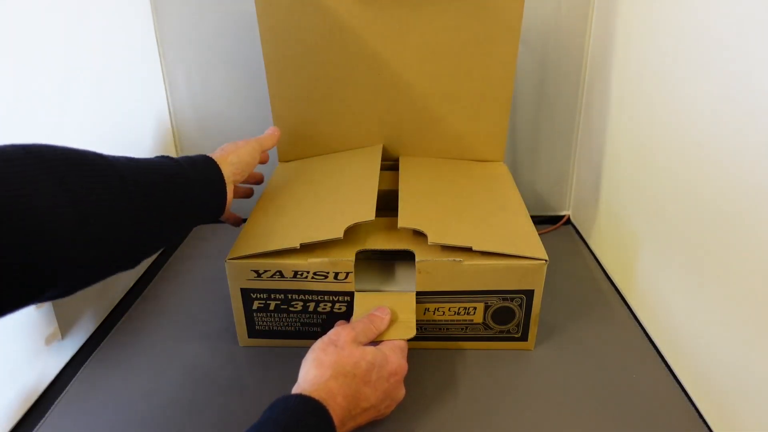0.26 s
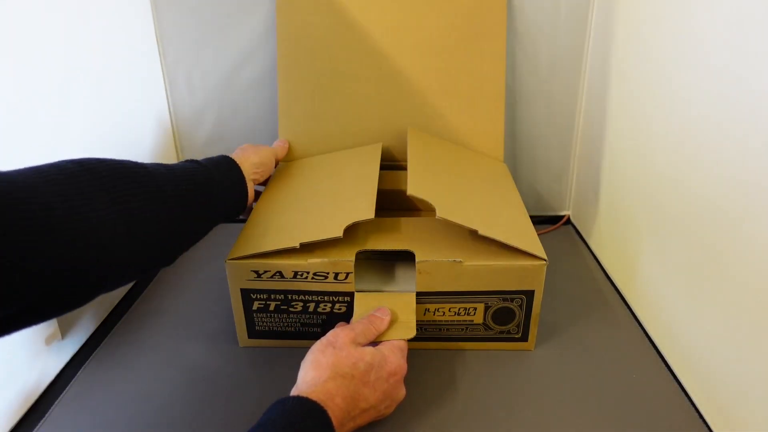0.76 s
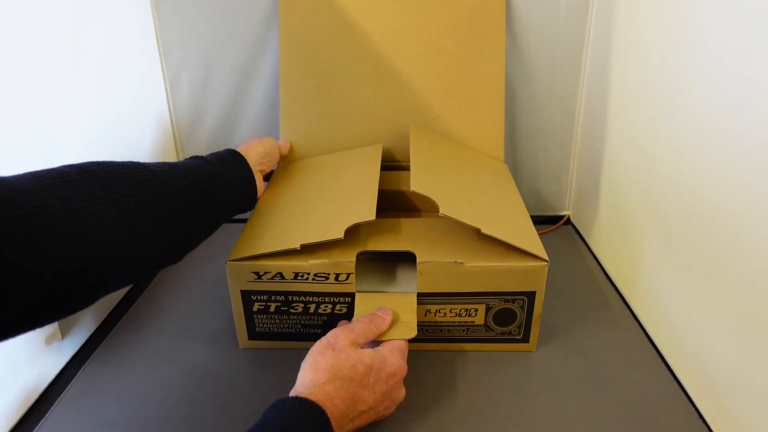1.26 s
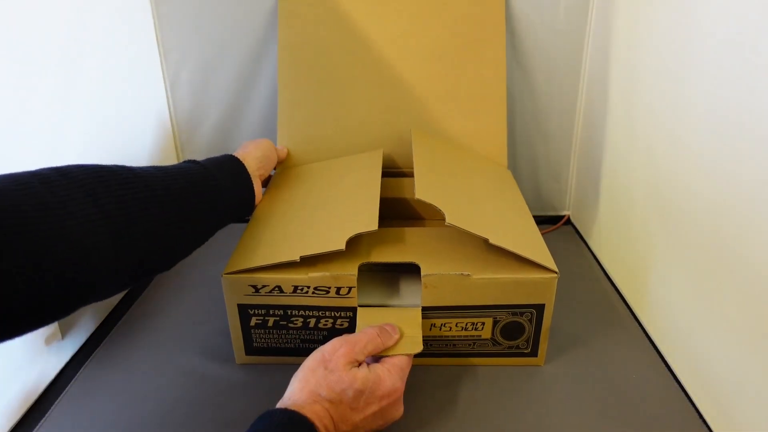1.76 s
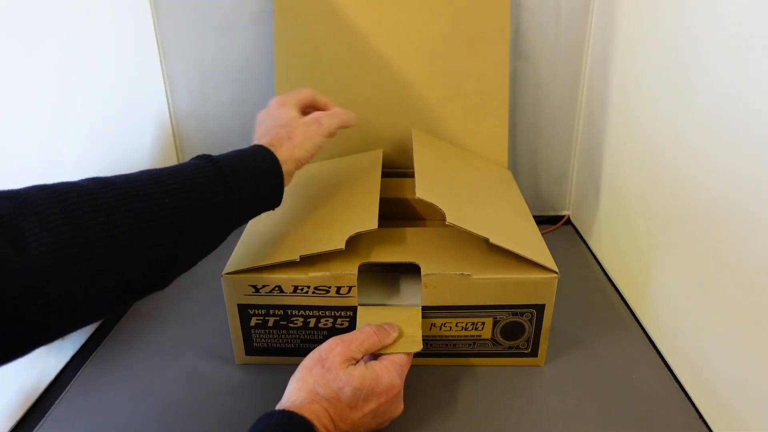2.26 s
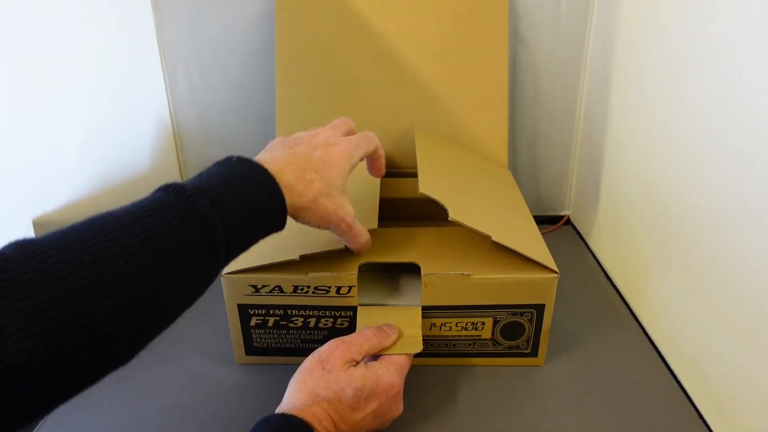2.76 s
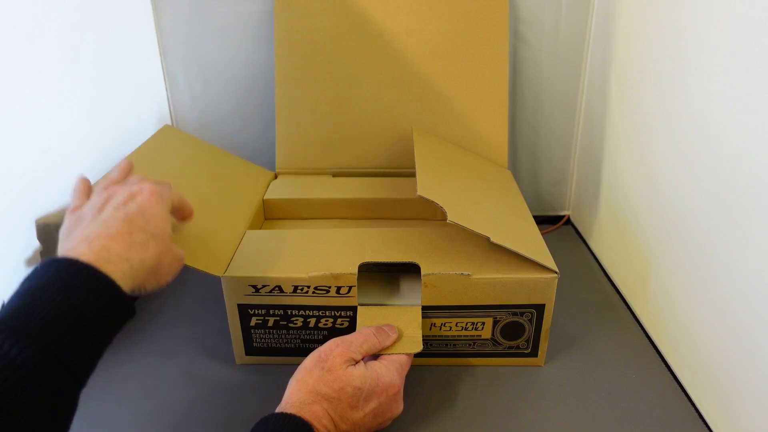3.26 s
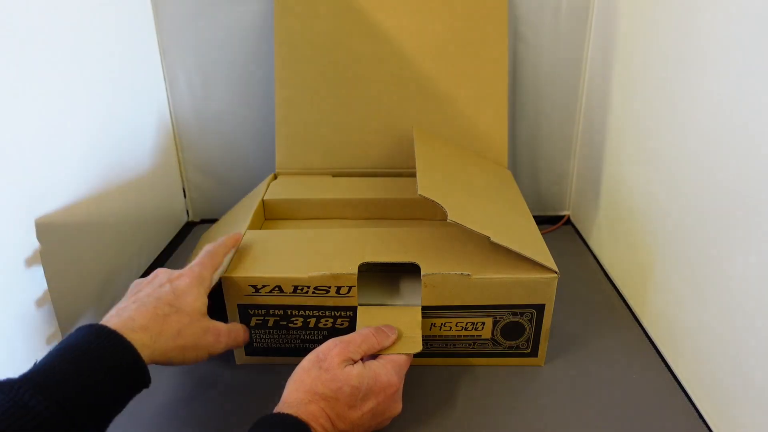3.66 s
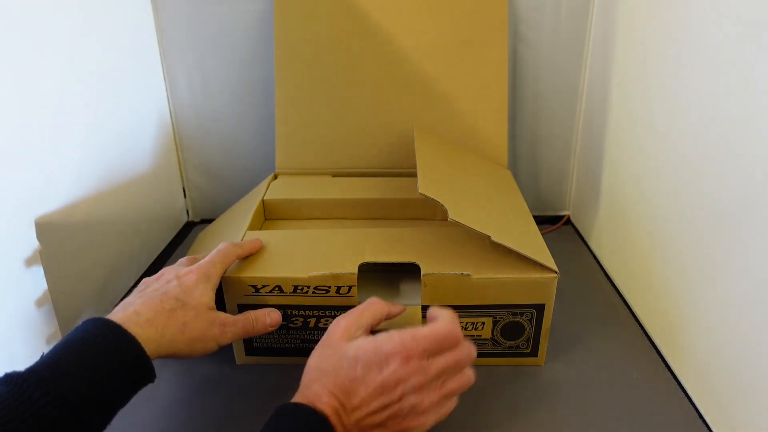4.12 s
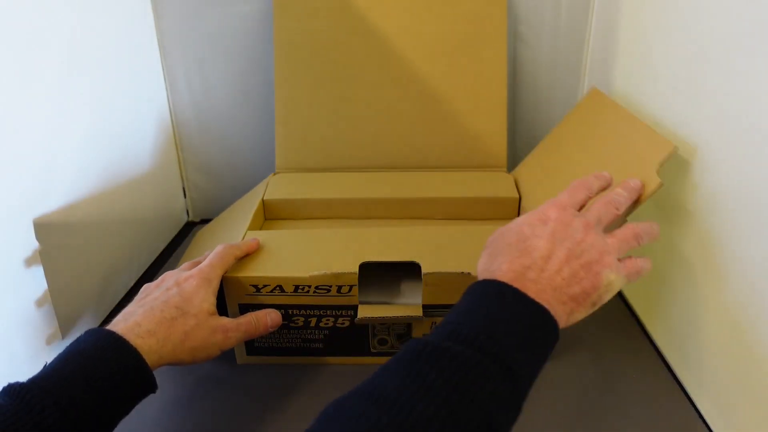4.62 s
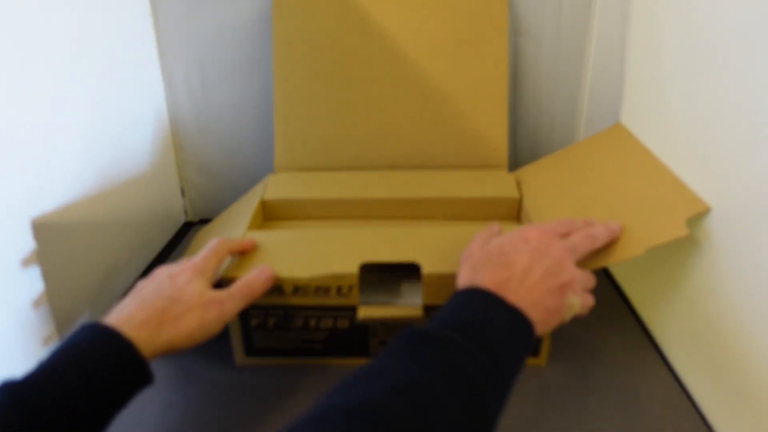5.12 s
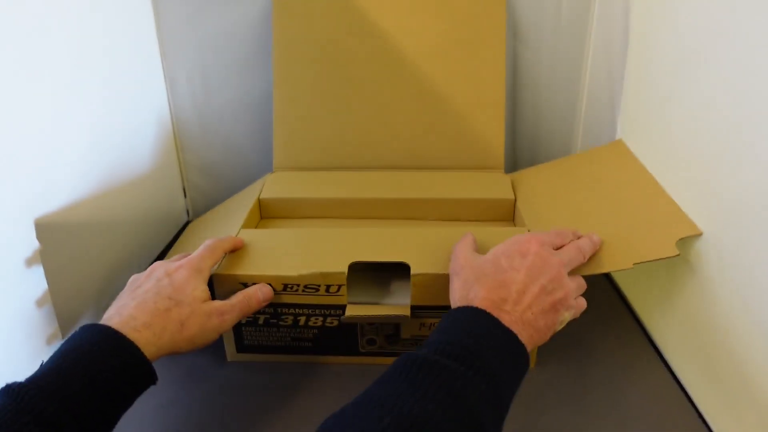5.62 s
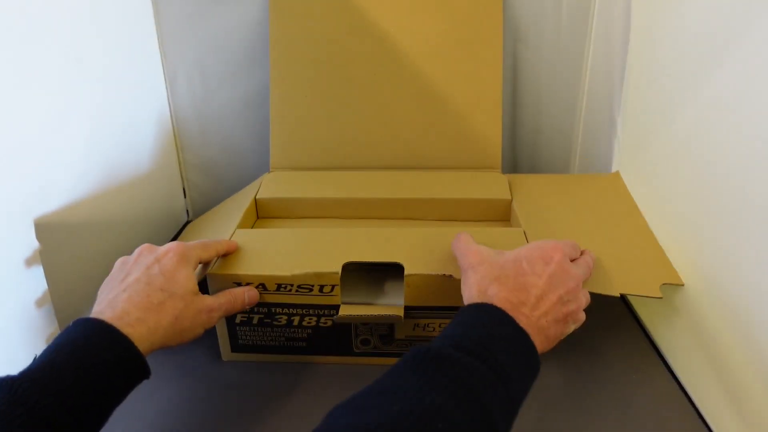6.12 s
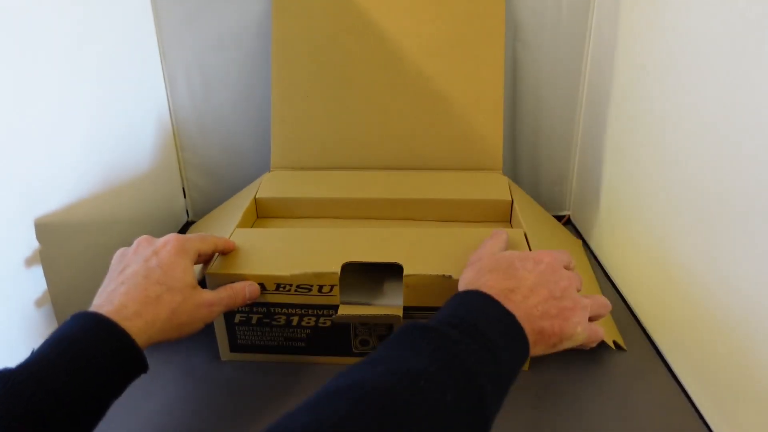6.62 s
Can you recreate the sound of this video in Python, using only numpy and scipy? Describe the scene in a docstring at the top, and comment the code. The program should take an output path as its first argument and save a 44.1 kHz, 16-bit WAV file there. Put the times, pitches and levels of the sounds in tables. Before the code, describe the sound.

Steady low air noise, short room echo. Fingers slide and tap lightly on an empty-sounding carton, with dry fibre clicks and boxy thuds, mostly soft and sparse. Toward the end come a brief hissing scrape, then much louder rasping stick-slip bursts of a cardboard edge dragging on a wall, with sharp cracks, before dying to faint rubbing. Close stereo microphone, roughly centred.

```python
"""Cardboard box in a narrow corner of a quiet room; hands open its two flaps.
Sliding fingers and edges: random friction rings the hollow box, the board and the fibres.
Fingertip knocks drum on box modes, edges tick as ringing crackles, fibres crack as clicks.
At last the edge of the right flap judders down a wall in stick-slip strokes.
Scattered echoes of the corner, a short room tail and steady air noise surround it."""
import sys
import numpy as np
from scipy import signal
from scipy.fft import rfft, irfft, next_fast_len
from scipy.io import wavfile

SR = 44100
rng = np.random.default_rng(int(sys.argv[2]) if len(sys.argv) > 2 else 0)


def bounce(signal):
    """Save signal as a 16-bit WAV file at the path given by the first command-line argument."""
    frames = np.transpose(np.atleast_2d(signal))
    limited = np.clip(frames, -1, 1)
    pcm = np.round(limited * 32767).astype(np.int16)
    wavfile.write(sys.argv[1], SR, pcm)


def volts(x):
    """Linear amplitude factor 10**(x/20) for a level x in dB, scalar or array-like."""
    e = np.asarray(x, float) / 20
    return 10 ** e


N = 303408

# edges catching: start_s, level_db, ring_hz
TICKS = [(0.3563, -31, 990), (0.853, -24, 1650), (3.0064, -19, 1080), (3.3555, -21, 2550),
         (3.503, -23.5, 1470), (3.7269, -26.5, 1200), (3.8818, -17.5, 2300), (3.945, -23, 2400),
         (4.153, -16.5, 1200), (4.2145, -19.5, 1450), (4.2927, -27, 1220), (4.4493, -25.5, 4080),
         (4.619, -38, 5070), (5.2362, -20.5, 1190), (5.396, -22, 1140), (6.031, -2, 910),
         (6.468, -21.5, 2880), (6.7415, -32.5, 2310)]
# soft fingertip knocks on the box: start_s, level_db, favoured_hz, shoved_air_db
KNOCKS = [(0.011, -31, 259, -5), (0.297, -24.5, 292, -18), (0.355, -15, 275, -8), (0.791, -24, 250, -1),
          (2.4165, -11.5, 427, 16), (2.427, -16, 297, -6), (2.441, -21, 277, 0), (2.494, -17, 455, 20),
          (2.543, -19, 199, 13), (3.343, -16.5, 350, 15), (3.895, -21, 250, -7), (4.211, -39, 196, 9.5),
          (4.372, -20.5, 295, 7), (4.421, -22, 350, 14), (4.469, -23, 600, 1), (4.637, -22, 455, 7)]
# single fibres cracking, dry and bright: start_s, level_db
SNAPS = [(.7883, -28), (2.4155, -27), (2.433, -28), (2.4885, -26), (3.3432, -17), (3.356, -20),
         (3.8805, -22), (4.198, -33), (5.9195, -11), (6.249, -8)]

# resonances of the hollow box: centre_hz, width_hz, level_db
BOX_MODES = [(126, 53, -11.5), (216, 53, 0.5), (275, 47, 2.5), (395.4, 62, 1), (448, 55, 2),
             (670, 250, -2.5)]
# resonances of the lid panels: centre_hz, width_hz, level_db
LID_MODES = [(670, 10, 6.5), (820, 91, 6.5), (1200, 450, -2), (1577, 215, 2), (2004, 380, -3),
             (2810, 950, -4), (4060, 1240, -11.5)]
# resonances of a panel held by one edge only: centre_hz, width_hz, level_db
FREE_PANEL_MODES = [(760, 200, 2), (1200, 280, 4.5), (1580, 280, 5.5), (2600, 420, 1.5), (3750, 760, -3)]
# resonances of the flap pressed on the wall: centre_hz, width_hz, level_db
WALL_FLAP_MODES = [(752, 142, -1), (823, 75, 5), (968, 73, -2.5), (1115, 76, -2), (1290, 117, -4.5),
                   (1474, 98, 1), (1660, 172, -1), (2310, 410, -9), (2997, 220, -7), (3326, 170, -13),
                   (4010, 254, -8)]
# broad resonances of the fibres: centre_hz, width_hz, level_db
FIBRE_MODES = [(4640, 2200, -1), (6420, 2400, 6.5), (7910, 3900, 6), (10220, 4400, 3), (13700, 3800, -2)]

# strokes of fingers and edges, swelling and fading:
# start_s, length_s, level_db, drum_db (re level), hiss_db (re level)
SLIDES = [(-.02, 0.18, -47.5, -15, -5), (.14, 0.27, -55, -21, 0), (.845, 0.087, -49, -2, -11),
          (1.2, 0.21, -48, -3.5, -6.5), (1.46, 0.37, -35, -7, -5.5), (2.89, .1, -41.5, -8.5, -2),
          (3.1, 0.44, -46, -17, -1.1), (3.375, 0.076, -44, -14, 2.5), (3.97, 0.15, -40, -14.5, -2),
          (4.09, 0.1, -43, -10, -3), (4.52, 0.087, -44.5, -6, -1), (4.85, 0.097, -21, -26, -1),
          (5.025, 0.057, -27.5, -11.5, -3), (5.13, 0.059, -25, -10, -2), (5.94, 0.066, -13.5, -16, -7),
          (6.39, 0.094, -39, -7.5, -2.5), (6.51, 0.16, -47.5, -14, -4.5), (6.75, 0.42, -47, -12, -2)]
SLIDE_RISE_DB_PER_S, SLIDE_FALL_DB_PER_S, SWELL_DB = 402, 240, 7.5
# a hand lands or a stuck edge breaks loose, holds, lets go:
# start_s, length_s, level_db, drum_db (re level), hiss_db (re level)
SLIPS = [(.553, .06, -38, 0, -5), (.788, 0.016, -36, -9, -2), (1.536, .03, -39, -6, -6),
         (1.604, .02, -35, -7, -6), (1.948, 0.13, -41.5, -7, -5.5), (2.405, 0.03, -37, -4, -3.5),
         (2.476, 0.048, -36.5, -3, -6), (2.54, 0.01, -41.5, -6, -4), (2.791, 0.027, -41.5, -5.5, -2),
         (3.004, 0.034, -39.5, -8.5, -2.5), (3.331, 0.05, -40, -1, -4.5), (3.725, .08, -47.5, -9, -2),
         (3.88, 0.013, -39, -12, -4), (4.21, 0.019, -39.5, -0.5, -6), (4.364, 0.018, -38.5, -2, -2),
         (4.412, 0.013, -37, -3, -3), (4.45, 0.014, -35.5, -3.5, -3.5), (4.615, 0.014, -37.5, -4, -0.6),
         (4.782, 0.06, -38.5, -20, -2.5), (5.256, 0.067, -27, -11.5, -2.5), (5.395, 0.013, -38.5, -8, -3),
         (6.229, 0.075, -11.5, -21, -8.5)]
SLIP_RISE_DB_PER_S, SLIP_FALL_DB_PER_S, SAG_DB = 2600, 358, 1.5
# firm strokes, level or climbing, that end abruptly:
# start_s, length_s, end_level_db, drum_db (re level), hiss_db (re level), climb_db
FIRM_STROKES = [(.612, .051, -18.5, -12.5, -2, 9), (5.43, 0.14, -31.5, -13.5, -10.5, 4.7),
                (5.58, .187, -15, -22, -4.5, 10), (5.834, 0.076, -16.5, -15, -7.5, 0.9),
                (6.072, .122, -13, -18, -9.5, 0.5)]
FIRM_RISE_DB_PER_S, FIRM_FALL_DB_PER_S, DRUM_CLIMB_SHARE = 459, 708, 0.4
SETTLE_DB, SETTLE_DB_PER_S = -17.5, 136   # faint settling after each stroke
HISS_DIES_DB = 1.5   # extra loss of hiss once a stroke has fallen by SETTLE_DB

# brief dips and lifts in the scrape: centre_s, depth_db (negative lifts)
SCRAPE_DIPS = [(5.246, 12), (5.913, 20), (5.926, 0), (6.026, -5), (6.043, 17), (6.219, -1)]
DIP_S = 0.005
# air between flap and wall, dropping in pitch as they meet: time_s, pitch_hz
GAP_PITCH = [(4.83, 900), (4.905, 836.5), (4.945, 563), (4.99, 500)]
FLAP_EDGE_HZ = 2950   # whistle of the free edge
# topmost treble of the hiss: time_s, level_db
SHEEN_CURVE = [(.3, -6), (2.6, -1), (3.2, 6), (4.9, 3), (5.6, -2)]
SHEEN_HZ = 12500
ON_BOX_S = (1.1, 4.72)   # hands on the box between these, else on a free panel
WALL_PRESSED_S = (5.3, 5.35)   # right flap, dragging on the wall, bends against it
BOARD_T60_MS, BOARD_DB = 40, -8   # many small modes of the board

# balance: time_s, left_minus_right_db
PAN_CURVE = [(0, 0), (4.7, 1), (5.1, -1), (6.3, -0.5), (6.5, 0.5)]
# spectrum shape of the air noise: frequency_hz, relative_db
AIR_SPECTRUM = [(24, -56), (40, -2.5), (176, 1), (283, 2), (570, -6), (1590, -8), (1950, -11.5),
                (14500, -19), (16000, -18.5)]
AIR_RMS_DB = -53.5
ROOM_T60_S, ROOM_DB, WALL_CUT_HZ = 0.39, -18.5, 4900   # T60 in the bass
ECHO_T60_MS, ECHO_DB, ECHO_CUT_HZ = 55, -11, 3500


def rms_one(x):
    """Scale to rms 1."""
    return x / np.sqrt(np.mean(x ** 2) + 1e-20)


def in_time(rows):
    """Columns of a curve, interpolated at every sample."""
    s, *columns = np.transpose(rows)
    return [np.interp(np.arange(N) / SR, s, c) for c in columns]


def drift(rate_hz):
    """Slow chance of rms 1: noise through two equal poles, at every 40th sample."""
    r = np.exp(-80 * np.pi * rate_hz / SR)
    noise = rng.standard_normal(N // 40 + 2002)
    slow = signal.lfilter([1], [1, -2 * r, r * r], noise)[2000:]
    return np.interp(np.arange(N) / 40, np.arange(len(slow)), rms_one(slow))


def cut(x, hz, kind, order=2):
    """Butterworth high- or low-pass."""
    return signal.sosfilt(signal.butter(order, hz, kind, fs=SR, output="sos"), x)


def resonance(hz, width_hz):
    """Two-pole filter with gain about 1 at its centre."""
    r = np.exp(-np.pi * width_hz / SR)
    b = (1 - r * r) / 2 * np.array([1, 0, -1])
    return b, [1, -2 * r * np.cos(2 * np.pi * hz / SR), r * r]


def resonate(x, modes, waver_db=0):
    """Parallel modes of alternating sign; the contact point wanders, so each drive wavers."""
    out = 0
    for k, (hz, width_hz, level_db) in enumerate(modes):
        driven = x * volts(waver_db * drift(7.7)) if waver_db else x
        ringing = signal.lfilter(*resonance(hz, width_hz), driven + 1e-18)
        out = out + (-1) ** k * volts(level_db) * ringing
    return out


def rubbed(force, level_db, modes, waver_db):
    """Friction force rings a body whose click response is scaled to unit energy."""
    click_response = resonate(signal.unit_impulse(SR // 4), modes)
    return resonate(force * volts(level_db), modes, waver_db) / np.linalg.norm(click_response)


def scatter(x, t60_ms):
    """Equal-power smear by three dying noise bursts; their mix drifts as hands and flaps move."""
    decay = volts(-60000 * np.arange(SR // 8) / SR / t60_ms)
    bursts = rng.standard_normal((3, SR // 8)) * decay
    weights = volts(9 * np.array([drift(2.5) for _ in bursts]))
    weights = weights / np.linalg.norm(weights, axis=0)
    out = 0
    for weight, burst in zip(weights, bursts):
        out = out + signal.oaconvolve(x * weight, burst / np.linalg.norm(burst))[:N]
    return out


def room_tone():
    """Steady shaped air noise, mostly alike in both channels."""
    hz = np.maximum(np.fft.rfftfreq(N, 1 / SR), 1)
    shape_hz, shape_db = np.transpose(AIR_SPECTRUM)
    shape = volts(np.interp(np.log(hz), np.log(shape_hz), shape_db))
    mid, side = irfft(rfft(rng.standard_normal((2, N))) * shape, N)
    return volts(AIR_RMS_DB) * rms_one(mid + volts(-5.0) * side * np.array([[1], [-1]]))


def rubbing():
    """Friction drives the hollow box, the panel under the contact, the fibres and the air gap."""
    power = (strokes(SLIDES, SLIDE_RISE_DB_PER_S, SLIDE_FALL_DB_PER_S, swell_db=SWELL_DB)
             + strokes(SLIPS, SLIP_RISE_DB_PER_S, SLIP_FALL_DB_PER_S, sag_db=SAG_DB)
             + strokes(FIRM_STROKES, FIRM_RISE_DB_PER_S, FIRM_FALL_DB_PER_S))
    drum_db, rasp_db, hiss_db = 10 * np.log10(power + 1e-12) + scrape_dips()
    fine = friction(2500, spread_db=0.0, smooth_db=-4.5, judder_db=1.5)
    coarse = friction(1100, spread_db=2.2, smooth_db=-10, judder_db=0.7)
    stroking = 0.8 * fine + 0.6 * coarse
    t = np.arange(N) / SR
    bent = np.interp(t, WALL_PRESSED_S, [0, 1])
    on_box = (t > ON_BOX_S[0]) & (t < ON_BOX_S[1])

    panels = (free_panel(stroking * ~on_box * np.sqrt(1 - bent), rasp_db)
              + lid(stroking * on_box, rasp_db)
              + flap_on_wall(stroking, bent, rasp_db))
    board = cut(panels, 576, "high") + fibre_hiss(fine, coarse, bent, hiss_db) + air_gap(fine, hiss_db)
    small_modes = volts(BOARD_DB) * scatter(board, BOARD_T60_MS)
    return box_drum(fine, drum_db) + volts(-1.5) * (board + small_modes)


def strokes(rows, rise_db_per_s, fall_db_per_s, swell_db=0, sag_db=0):
    """Power in box, panel and fibres of strokes that rise, hold, fall and settle."""
    t, power = np.arange(0, N, 8) / SR, 0
    climb_share = np.array([[DRUM_CLIMB_SHARE], [1], [1]])
    fibres_only = np.array([[0], [0], [1]])
    for start_s, length_s, level_db, drum_db, hiss_db, *climb_db in rows:
        along = np.clip((t - start_s) / length_s, 0, 1)
        after_s = np.maximum(t - start_s - length_s, 0)
        rise_db = rise_db_per_s * np.minimum(t - start_s, 0)
        ending_db = np.maximum(-fall_db_per_s * after_s, SETTLE_DB - SETTLE_DB_PER_S * after_s)
        held_db = -swell_db * (2 * along - 1) ** 2 - sag_db * along
        to_climb_db = sum(climb_db) * (1 - along) * climb_share
        stroke_db = level_db + rise_db + held_db + ending_db - to_climb_db
        hiss_loss_db = HISS_DIES_DB * ending_db / SETTLE_DB * fibres_only
        # power not in the hiss goes to the panel
        hiss = min(volts(2 * hiss_db), 0.95)
        shares = np.array([[volts(2 * drum_db)], [1 - hiss], [hiss]])
        power = power + shares * volts(2 * (stroke_db - hiss_loss_db))
    return np.repeat(power, 8, axis=1)[:, :N]


def friction(catches_per_s, spread_db, smooth_db, judder_db):
    """Fibres catch and let go at random over a smooth sliding noise; the grip judders."""
    sizes = volts(spread_db * np.minimum(rng.exponential(1, N), 4)) * rng.choice([-1, 1], N)
    grains = rms_one(sizes * (rng.random(N) < catches_per_s / SR))
    judder = volts(judder_db * drift(110))
    return rms_one((grains + volts(smooth_db) * rng.standard_normal(N)) * judder)


def box_drum(force, level_db):
    """Friction rings the low modes of the hollow box."""
    return cut(rubbed(force, level_db, BOX_MODES, waver_db=3.0), 810, "low")


def free_panel(force, level_db):
    """Friction rings a panel held by one edge only."""
    return rubbed(force, level_db, FREE_PANEL_MODES, waver_db=1.5)


def fibre_hiss(fine, coarse, bent, level_db):
    """Friction rings the fibres, coarser on the wall; the topmost treble follows its own curve."""
    force = (0.9 - 0.3 * bent) * fine + (0.4 + 0.4 * bent) * coarse
    hiss = rubbed(force, level_db, FIBRE_MODES, waver_db=1.0)
    sheen_db, = in_time(SHEEN_CURVE)
    hiss = hiss + (volts(sheen_db) - 1) * cut(hiss, SHEEN_HZ, "high")
    return cut(hiss, 3340, "high")


def knocks():
    """A fingertip shoves air and hits a spot that favours the box modes near one pitch."""
    pushes, spots = np.zeros(N), np.zeros(N + SR)
    click = signal.unit_impulse(SR // 8)
    for start_s, level_db, favoured_hz, air_db in KNOCKS:
        at = round(start_s * SR)
        pushes[at] = volts(air_db)
        spot = signal.lfilter(*resonance(favoured_hz, 0.5 * favoured_hz), click)
        spots[at:at + SR // 8] += volts(level_db + 29.5) * spot
    shoved_air = cut(cut(pushes + 1e-18, 190, "low"), 123, "high")
    return resonate(spots[:N], BOX_MODES) + volts(-7.0) * spots[:N] + shoved_air


def near_walls(x):
    """The corner scatters the treble, differently towards each channel."""
    treble = cut(x, ECHO_CUT_HZ, "high")
    return np.array([scatter(treble, ECHO_T60_MS), scatter(treble, ECHO_T60_MS)])


def room(x):
    """Eight feedback delays a side, duller on every round; part of the tail is shared."""
    size = next_fast_len(N + SR)
    w = 2 * np.pi * np.fft.rfftfreq(size)
    dull = np.exp(-2 * np.pi * WALL_CUT_HZ / SR)
    wall = (1 - dull) / (1 - dull * np.exp(-1j * w))
    response = np.zeros((2, len(w)), complex)
    for k, lag in enumerate(rng.uniform(0.008, 0.035, 16) * SR):
        loop = volts(-60 * lag / SR / ROOM_T60_S) * wall * np.exp(-1j * w * lag)
        response[k % 2] += (-1) ** (k // 2) * loop / (1 - loop)
    left, right = irfft(response * rfft(x, size), size)[:, :N]
    return np.array([left + 0.46 * right, right + 0.63 * left])


def ticks():
    """A short crackle swells for a few ms and dies; it rings the bit of board it comes from."""
    out, t = np.zeros(N + SR), np.arange(SR // 8) / SR
    for start_s, level_db, ring_hz in TICKS:
        envelope = volts(level_db - 5 - 60 * t / 0.045) * np.minimum(t / 0.006, 1)
        crackle = envelope * rng.standard_normal(len(t))
        ring = signal.lfilter(*resonance(ring_hz, 0.22 * ring_hz), crackle)
        dry_crackle = cut(cut(crackle, 500, "high"), 3100, "low", order=1)
        at = round(start_s * SR)
        out[at:at + len(t)] += dry_crackle + volts(10) * ring
    return out[:N]


def snaps():
    """A cracking fibre is a two-sample click with a noise tail of a few ms."""
    out, t = np.zeros(N + SR), np.arange(SR // 50) / SR
    for start_s, level_db in SNAPS:
        crack = volts(level_db - 9.5 - 60 * t / 0.019) * rng.standard_normal(len(t))
        crack[:2] += volts(level_db) * np.array([1, 0.7])
        at = round(start_s * SR)
        out[at:at + len(t)] += crack
    return cut(out[:N] + 1e-18, 570, "high")


def lid(force, level_db):
    """Friction rings the panels of the lid."""
    return rubbed(force, level_db, LID_MODES, waver_db=1.3)


def air_gap(force, level_db):
    """A gliding tone, its overtone and a steady whistle, fluttering with the slow part of the force."""
    hz, = in_time(GAP_PITCH)
    t, phase = np.arange(N) / SR, 2 * np.pi * np.cumsum(hz) / SR
    closing = (t > GAP_PITCH[0][0]) & (t < GAP_PITCH[-1][0])
    flutter = 1 + 0.88 * rms_one(cut(force, 114, "low"))
    whistle = 0.65 * np.cos(2 * np.pi * FLAP_EDGE_HZ * t)
    tones = np.cos(phase) + 0.45 * np.cos(2 * phase) + whistle
    return volts(level_db - 9.5) * closing * flutter * tones


def scrape_dips():
    """Brief Gaussian dips and lifts in the scrape, in dB."""
    t = np.arange(N) / SR
    return sum(-depth_db * np.exp(-((t - s) / DIP_S) ** 2) for s, depth_db in SCRAPE_DIPS)


def flap_on_wall(stroking, bent, level_db):
    """Stick-slip chatter and friction ring the flap bent against the wall."""
    force = 0.5 * stroking + 0.87 * chatter(300, uneven_db=3.5, spread_db=2.5)
    return rubbed(force * np.sqrt(bent), level_db, WALL_FLAP_MODES, waver_db=1.8)


def chatter(hops_per_s, uneven_db, spread_db):
    """The edge hops along the wall: slips in uneven but unbroken succession."""
    rate = hops_per_s * volts(uneven_db * drift(150))
    hops = np.diff(np.floor(np.cumsum(rate / SR)), prepend=0)
    return rms_one(hops * volts(spread_db * rng.standard_normal(N)) * rng.choice([-1, 1], N))


def scene():
    """The box, slightly panned, in the room."""
    box = rubbing() + knocks() + ticks() + snaps()
    pan_db, = in_time(PAN_CURVE)
    reflected = volts(ECHO_DB) * near_walls(box) + volts(ROOM_DB) * room(box)
    return (box + reflected) * volts(pan_db * [[0.5], [-0.5]]) + room_tone()


def low_pass(x):
    """Removes everything above the highest recorded frequency."""
    return signal.sosfilt(signal.butter(12, 16810, fs=SR, output="sos"), x)


def record(dry):
    """Rounds the peaks, cuts the deep bass and the top."""
    heard = cut(np.tanh(dry), 145, "high")
    top_cut = signal.cheby2(20, 60, 16350, fs=SR, output="sos")
    mix = signal.sosfilt(top_cut, heard)
    return low_pass(mix)


dry = scene()
out = record(dry)
bounce(out)
```